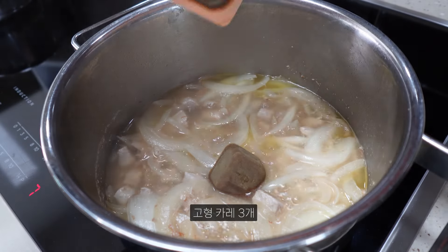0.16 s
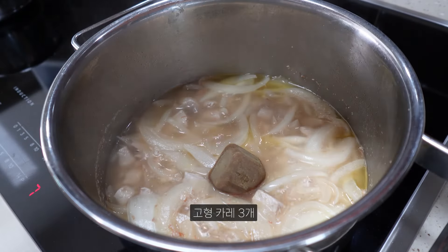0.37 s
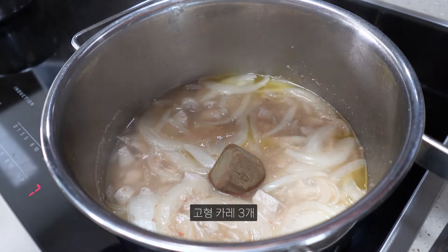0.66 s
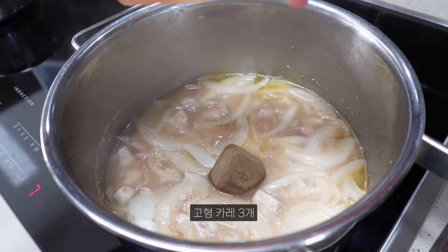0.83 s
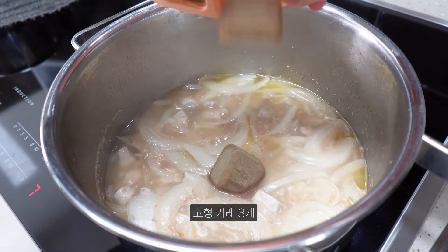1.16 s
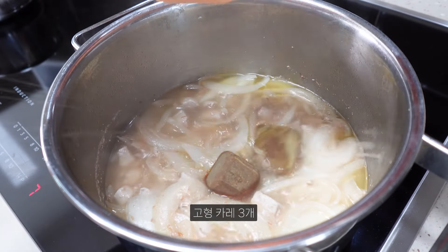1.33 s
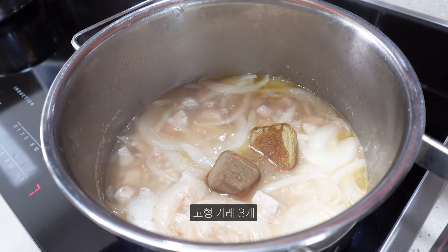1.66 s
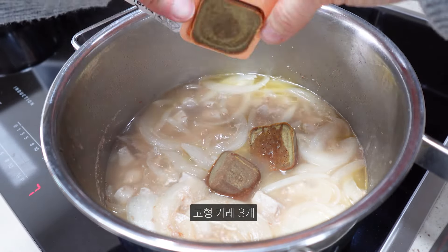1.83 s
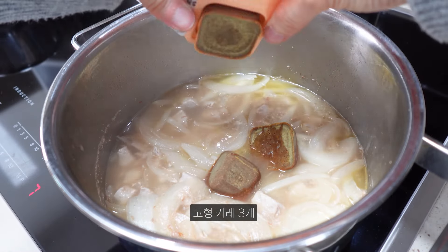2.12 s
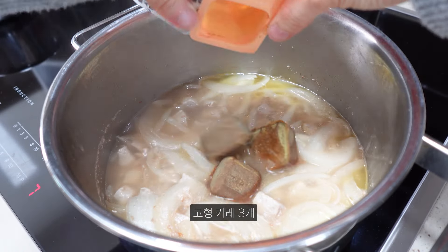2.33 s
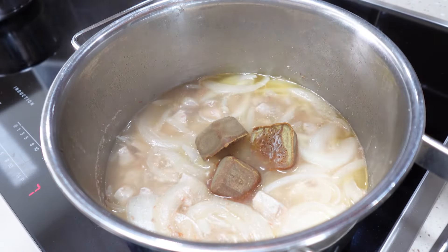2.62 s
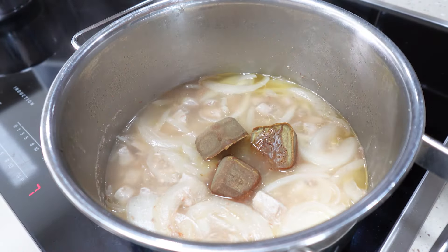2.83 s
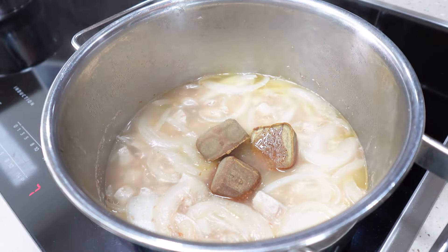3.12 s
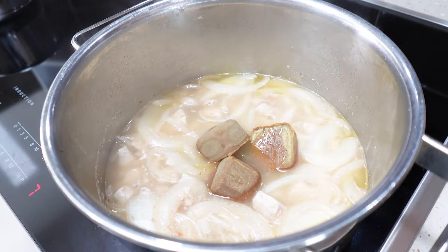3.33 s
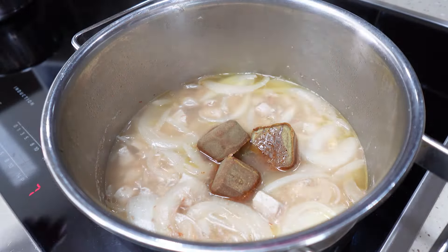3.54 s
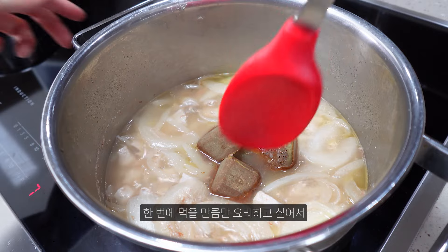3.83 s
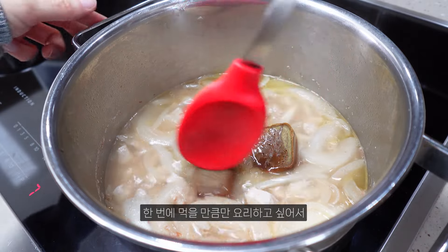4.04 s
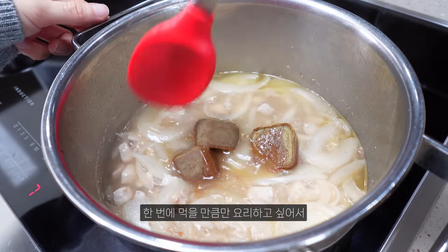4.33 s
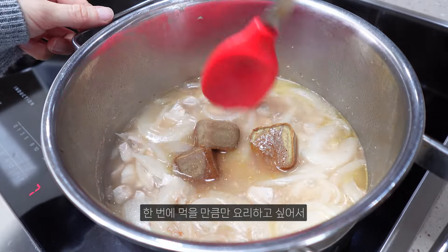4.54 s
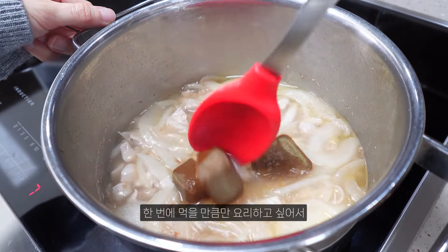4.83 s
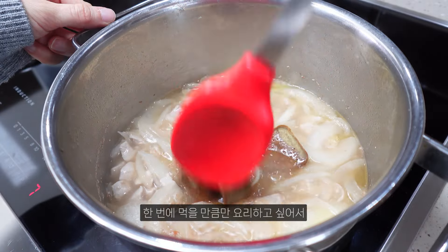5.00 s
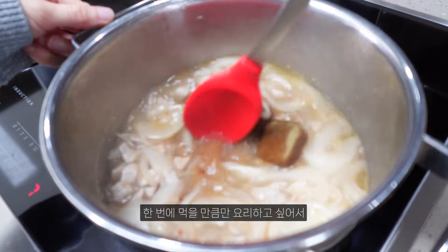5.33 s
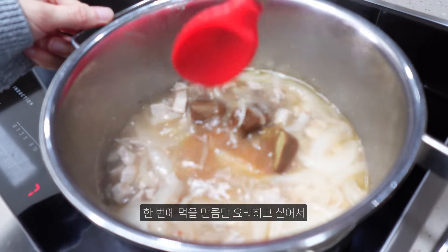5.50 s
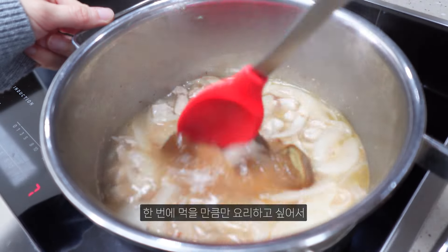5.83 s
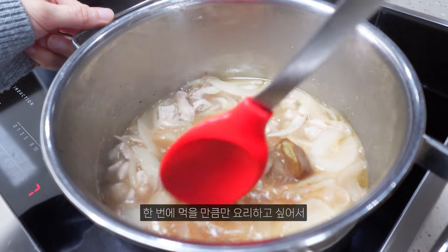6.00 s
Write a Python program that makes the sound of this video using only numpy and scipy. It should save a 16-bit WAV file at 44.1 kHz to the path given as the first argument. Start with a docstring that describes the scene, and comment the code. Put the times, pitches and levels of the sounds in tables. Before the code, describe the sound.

A steel pot of broth simmers throughout, heard from close above in a kitchen: tiny bubbles fizz and pop over a low, hollow bubbling, with a faint hum and thin hiss from the hob. For the first three seconds a stiff plastic tray is flexed, giving loud, sharp cracks and a light finger rustle. The cracks come in clusters around 0.6 and 0.9 seconds, most densely from 1.2 to 1.6, and again from 2.3 to 3. Blocks plop into the broth at about 0.1, 1.3 to 1.5 and 2.4 to 2.6 seconds. Then the tray stops and everything is much quieter. From about 3.5 seconds a ladle stirs with soft wet slaps and rubs, the pot wall ringing faintly at first. The boil swells briefly at 4 seconds, and gentle stirring, small pops and dull steam knocks continue until the end, just after 6 seconds.

```python
"""A steel pot of broth simmers on a humming, hissing induction hob, heard from close above.
From the start a plastic tray is flexed and cracks in clusters, and stock blocks plop into the broth.
After three seconds the tray falls quiet; a ladle stirs with soft wet slaps and the pot wall rings.
All the way to the end, tiny bubbles burst on the surface while big steam bubbles
collapse on the base and thump the air column of the pot."""
import sys
import numpy as np
from scipy import signal
from scipy.fft import rfft, irfft
from scipy.io import wavfile
from scipy.ndimage import uniform_filter1d, minimum_filter1d

SR = 44100
rng = np.random.default_rng(int(sys.argv[2]) if len(sys.argv) > 2 else 0)


def wrap_up_sound(samples):
    """Save the sound to the file named by the first command line argument, as 16-bit audio."""
    columns = np.atleast_2d(samples).T
    # keep every value between -1 and 1, then stretch to whole-number steps
    tamed = np.clip(columns, -1, 1)
    steps = np.round(tamed * 32767).astype(np.int16)
    wavfile.write(sys.argv[1], SR, steps)


N = 271656
T = np.arange(N) / SR


def undb(db):
    return 10 ** (np.asarray(db) / 20)


def unit(x):
    return x / np.sqrt(np.mean(x ** 2))


def noise(size=N):
    return rng.standard_normal(size)


def fade(size, t60):
    return 1000. ** (-np.arange(size) / SR / max(t60, .001))


def ring(x, hz, width):
    """Two-pole resonance, gain 1 at the centre; width in Hz."""
    hz = min(hz, .4 * SR)
    return signal.lfilter(*signal.iirpeak(hz, max(hz / width, .3), fs=SR), x)


def curve(table):
    """One automation curve for each column after the time."""
    times, *columns = np.transpose(table)
    return [np.interp(T, times, column) for column in columns]


def flicker(rate):
    """Random levels held 1 / rate s and smoothed twice; spread near 1."""
    hold = int(SR / rate)
    steps = np.repeat(noise(N // hold + 1), hold)
    return unit(uniform_filter1d(uniform_filter1d(steps, hold), hold)[:N])


def colour(x, shape):
    """Equalises x along a (frequency [Hz], gain [dB]) curve, to unit RMS."""
    hz, db = np.transpose(shape)
    bins_hz = np.maximum(np.arange(N // 2 + 1) * SR / N, 1)
    gain = undb(np.interp(np.log(bins_hz), np.log(hz), db))
    return unit(irfft(rfft(x) * gain, N))


def place(out, start, grain, db, pan_db=0):
    """Lays a grain of the given peak level into the two channels."""
    i = int(start * SR)
    grain = grain[:N - i] / np.max(np.abs(grain))
    out[:, i:i + len(grain)] += undb(db + np.array([[pan_db], [-pan_db]]) / 2) * grain


def wide(make, side_db):
    """Two unrelated draws as mid and side."""
    return make() + undb(side_db) * make() * np.array([[1], [-1]])


def bubble(hz, t60, glide, size=3000):
    """A damped sine that glides up as the cavity closes."""
    t = np.arange(size) / SR
    return np.sin(2 * np.pi * hz * (t + glide * t ** 2 / t60)) * fade(size, t60)


def pop(hz):
    """A skin of broth tears: a ragged tick of noise around the pitch of the bubble."""
    tear = noise(300) * fade(300, 0.0054)
    return ring(ring(tear, hz, 0.34 * hz), hz, hz)


def tray_cracks():
    """Each crack is a quick cluster of slips that rings the stiff plastic."""
    # cracks: (time [s], level [dB], main ring [Hz], low ring re main [dB], treble re main [dB], t60 [s])
    cracks = [(0.0275, -19.5, 2360, -27, -9, 0.016), (0.0424, -15, 3540, -19, -8, 0.012),
              (0.0637, -9.5, 3860, -16, -2.5, 0.011), (0.3723, -23, 3270, -20, -14.5, 0.012),
              (0.4718, -30, 2270, -15, -11, 0.009), (0.4975, -26.5, 3350, -15, -14, 0.009),
              (0.549, -23, 3210, -18, -9, 0.009), (0.5737, 0, 4220, -11.5, -8, 0.007),
              (0.6258, -22, 2360, -20, -16, 0.009), (0.666, -20, 5110, -18, -11, 0.014),
              (0.6785, 1, 4340, -22, -7.5, 0.0046), (0.9273, -7, 4700, -17, -3, 0.009),
              (0.9397, -1, 3630, -27, -2, 0.0096), (0.9598, -6, 3080, -15, 1, 0.02),
              (1.1038, -23.5, 4700, -10, -13, 0.012), (1.1593, -14.5, 2600, -20, -13, 0.013),
              (1.173, -10.5, 2180, -24, -3, 0.022), (1.2413, -7.5, 4050, -20, -13, 0.014),
              (1.2822, -4, 4060, -24, -21, 0.009), (1.2927, -0.5, 1930, -10, -22, 0.0098),
              (1.3029, -12, 2240, -13, -15, 0.0081), (1.3185, -2, 3930, -15, -18, 0.0084),
              (1.3349, -2, 2270, -10.5, -6.5, 0.0085), (1.3642, -3.5, 3730, -15, -20, 0.0083),
              (1.4438, -12, 1840, -2, -19, 0.012), (1.4635, -2.5, 3170, -15, 3.5, 0.012),
              (1.4804, 0, 3970, -19, -8, 0.01), (1.4927, -4, 6200, -15, -11, 0.012),
              (1.497, 0, 4230, -9, -14, 0.012), (1.5132, -11, 3200, -23, -17, 0.0072),
              (1.5356, -6, 5960, -13, -18, 0.007), (1.5568, -14, 3870, -17, -17, 0.009),
              (1.5658, -9, 3880, -21, -21, 0.0058), (1.5774, -10.5, 5960, -7.5, -22, 0.0083),
              (1.7822, -4.5, 3600, -17.5, -6.5, 0.01), (1.9959, -28, 2100, -18, -9, 0.009),
              (2.0496, -21.5, 2000, -21, -12, 0.0096), (2.1158, -21.5, 2040, -12, -11, 0.009),
              (2.2608, -13.5, 3400, -8, 2, 0.016), (2.3396, -24.5, 3570, -9, -11, 0.009),
              (2.364, -7.5, 6240, -11.5, -19, 0.014), (2.3765, -7.5, 6400, -9, -19, 0.02),
              (2.392, 0, 3040, -32, -6, 0.019), (2.4937, -19, 3650, -1, -15, 0.0084),
              (2.5614, -37, 2800, -15, -11, 0.009), (2.6136, -2.5, 2900, -11, -6.5, 0.0081),
              (2.7071, -15.5, 3300, -10.5, -12, 0.0072), (2.7713, -15.5, 2450, -15, -12, 0.0075),
              (2.8325, -2, 5600, -13, -4, 0.014), (2.9317, -19.5, 2470, -13, -13, 0.013),
              (2.956, -21.5, 3500, -8, -11, 0.014), (2.9609, -9.5, 3350, -15.5, -26, 0.018)]
    # the tray drifts to the left: (time [s], left minus right [dB])
    drift = [(0, 1), (1.5, .5), (2.5, 0.5), (3.0, 2.5)]
    out = np.zeros((2, N))
    for start, db, hz, low_db, treble_db, t60 in cracks:
        slips = noise(2000) * fade(2000, t60)
        slips[8] = 2.23  # a sharp first snap
        main = unit(ring(ring(slips, hz, 0.75 * hz), hz, 1.5 * hz))
        low = unit(ring(ring(slips, 1570, 490), 1060, 670))
        attack = slips * fade(2000, 0.0063)  # the treble dies first
        treble = unit(ring(ring(attack, 7900, 9800), 9800, 18200))
        crack = main + undb(low_db) * low + undb(treble_db) * treble
        pan_db = np.interp(start, *np.transpose(drift)) + 0.8 * rng.standard_normal()
        place(out, start + .0007, crack, db, pan_db)
    return out


def finger_rustle():
    """Fingers shift on the tray with a gritty rustle."""
    # finger friction: (time [s], level [dB])
    friction = [(0.0, -40), (0.11, -54), (0.36, -46.5), (0.53, -45.5), (0.8, -56), (1.02, -47.5),
                (1.2, -47), (1.37, -39.5), (1.57, -43.5), (1.72, -57.5), (1.9, -64), (2.17, -50.5),
                (2.56, -50), (2.86, -45), (3.07, -52), (3.15, -67), (6.16, -82)]
    grit = noise() * undb(4.0 * flicker(110))
    return undb(curve(friction)[0]) * unit(ring(ring(grit, 1930, 4500), 2240, 9000))


def plops():
    """Blocks and drops slap the broth and trap a ringing bubble."""
    # landings: (time [s], level [dB], pitch [Hz], t60 [s], slap gain [dB])
    landings = [(.109, -12, 570, 0.012, -14), (.1447, -11, 520, 0.014, -9.5), (1.328, -9, 610, 0.015, 1.5),
                (1.377, -26, 617, 0.063, -15), (1.537, -8.5, 1076, 0.015, -9.5),
                (1.538, -18.5, 406, 0.02, -24), (2.358, -17.5, 392, 0.018, -7), (2.48, -19, 307, 0.02, -12),
                (2.494, -18.5, 344, 0.057, -2.5), (2.563, -13.5, 434, 0.0094, -10)]
    out = np.zeros((2, N))
    for start, db, hz, t60, slap_db in landings:
        slap = 2 * ring(ring(noise(3000), 1650, 1250), 1900, 1600) * fade(3000, 0.033)
        place(out, start, undb(slap_db) * slap - bubble(hz, t60, glide=0.049), db)
    return out


def steam_thumps():
    """Big steam bubbles collapse on the base, each a round, low knock."""
    # collapses: (time [s], level [dB], pitch [Hz])
    collapses = [(0.612, -43, 337), (0.793, -34, 358), (1.048, -28.5, 354), (1.291, -31, 600),
                 (1.433, -43, 363), (1.786, -35, 364), (1.942, -29.5, 365), (2.057, -43, 370),
                 (2.164, -32, 385), (2.258, -29.5, 370), (2.7, -30.5, 378), (3.84, -32, 287),
                 (4.046, -32.5, 238), (4.091, -37, 376), (4.355, -38, 353), (5.082, -36, 340),
                 (5.32, -33, 372), (5.577, -35, 368), (5.727, -35, 352), (5.806, -32.5, 229)]
    out = np.zeros((2, N))
    for start, db, hz in collapses:
        place(out, start, ring(bubble(hz, t60=0.04, glide=0.033), hz, 2.2 * hz), db)
    return out


def ladle_slaps():
    """The ladle slaps the broth: short, wet bursts of pitched noise."""
    # slaps: (time [s], level [dB], pitch [Hz])
    slaps = [(3.511, -39, 3330), (3.839, -36, 3640), (3.864, -41, 2380), (3.973, -41.5, 2410),
             (3.99, -42, 1230), (4.041, -37, 3870), (4.184, -38, 1230), (4.488, -40, 1040),
             (4.586, -39, 3700), (4.627, -41.5, 3980), (4.827, -36.5, 1220), (5.083, -39, 3270),
             (5.157, -35.5, 4320), (5.273, -46, 2450), (5.32, -41, 4200), (5.502, -41, 3660),
             (5.763, -38, 1230), (5.964, -35.5, 3730)]
    out = np.zeros((2, N))
    for start, db, hz in slaps:
        splash = noise(3000) * fade(3000, t60=0.05)
        place(out, start, ring(ring(splash, hz, 570), hz, 1100), db)
    return out


def surface_pops():
    """Single small bubbles burst at the surface and stand out of the fizz."""
    # bursts: (time [s], level [dB], pitch [Hz])
    bursts = [(0.519, -28, 8120), (0.8175, -31, 12200), (0.839, -30, 12200), (0.8684, -33, 12500),
              (0.9981, -28, 8920), (1.0206, -29, 10800), (1.1433, -28, 6240), (1.402, -29, 7210),
              (1.6945, -30, 7610), (1.914, -25, 12200), (2.0901, -29, 10300), (2.2338, -25, 9960),
              (2.465, -28, 8420), (2.539, -30, 12400), (2.693, -33, 7400), (2.9194, -34, 5350),
              (2.9901, -29, 13600), (3.074, -27.5, 9250), (3.109, -29, 13000), (3.1547, -31, 12100),
              (3.1892, -31, 12500), (3.3744, -27, 10600), (3.3877, -29, 8600), (3.4136, -23.5, 11500),
              (3.436, -29, 10700), (3.6272, -29, 13000), (3.7035, -27, 14000), (3.7274, -28.5, 9100),
              (3.9175, -28.5, 9200), (3.9936, -28, 9500), (4.0612, -31, 13400), (4.138, -31, 9850),
              (4.1827, -35, 10600), (4.2497, -32, 8800), (4.2702, -31, 10900), (4.35, -24, 12100),
              (4.4129, -32, 9200), (4.4483, -27, 8600), (4.5136, -33, 12400), (4.5376, -28, 13200),
              (4.587, -27.5, 7400), (4.6094, -34, 12300), (4.6932, -31, 13200), (4.7373, -30, 11900),
              (4.7936, -27.5, 7460), (4.8479, -28, 12900), (5.1078, -29, 12400), (5.13, -28.5, 6920),
              (5.1901, -35, 7500), (5.224, -23.5, 8200), (5.3597, -32, 13500), (5.5119, -32.5, 7920),
              (5.6535, -30, 13500), (5.889, -27.5, 13000)]
    out = np.zeros((2, N))
    for start, db, hz in bursts:
        place(out, start + 0.00031, pop(hz), db, pan_db=.4)
    return out


def rubs_and_wall_ring():
    """Fingers and ladle rub and squelch; around 3.5-4 s the pot's steel wall rings near 2.4 kHz."""
    # grainy, pitched swells: (start [s], length [s], pitch [Hz], width [Hz], level [dB])
    swells = [(0.191, 0.05, 10500, 3000, -44.5), (0.289, 0.019, 1860, 2520, -36),
              (0.379, 0.019, 5000, 4000, -37.5), (0.411, 0.02, 5030, 7000, -38),
              (0.484, 0.062, 3330, 900, -46), (1.179, 0.05, 1290, 500, -38),
              (1.184, 0.016, 2050, 300, -48.5), (1.396, 0.09, 3400, 1200, -44),
              (2.181, 0.085, 2050, 400, -45.5), (2.399, 0.067, 2930, 1500, -43.5),
              (3.507, 0.13, 3430, 500, -55.5), (4.63, 0.15, 2440, 300, -51),
              (5.017, 0.067, 2280, 300, -51.5), (5.062, 0.19, 6000, 5000, -57),
              (0.574, 0.054, 4700, 900, -48), (0.685, 0.097, 4600, 1200, -52),
              (3.498, 0.51, 2370, 160, -58), (3.952, 0.31, 1380, 500, -59), (5.202, 0.16, 2500, 500, -55)]
    out = np.zeros(N)
    for start, length, hz, width, db in swells:
        i, size = int(start * SR), int(length * SR)
        grit = noise(N // 10) * undb(3.5 * flicker(300)[:N // 10])
        band = unit(ring(ring(grit, hz, width), hz, 2 * width))[1000:1000 + size]
        out[i:i + size] += undb(db) * band * np.hanning(size) ** .5
    return out


def steam_surges():
    """Steam swells and sinks, making the pot boom: gains of the air column and of the rumble."""
    # surges: (start [s], length [s], air column level [dB], rumble level [dB])
    surges = [(0.1, 0.1, -42.5, -51), (0.611, 0.046, -46, -53), (0.793, 0.12, -41.5, -50),
              (1.038, 0.048, -42, -49), (1.284, 0.11, -42.5, -45), (1.433, 0.032, -49, -53),
              (1.514, 0.052, -49, -51), (1.924, 0.25, -42.5, -50), (2.223, 0.088, -41.5, -50),
              (2.347, 0.042, -32.5, -51), (2.48, 0.19, -38.5, -52), (2.703, 0.041, -47, -51),
              (2.755, 0.073, -41.5, -50), (2.867, 0.04, -54, -49), (3.117, 0.044, -48, -53),
              (3.51, 0.064, -55, -50), (4.068, 0.089, -46, -55), (4.349, 0.038, -49, -50),
              (4.481, 0.05, -44, -52), (4.56, 0.176, -41.5, -50.5), (4.78, 0.041, -42, -51),
              (4.857, 0.036, -49, -51), (5.079, 0.068, -46, -51), (5.29, 0.078, -48.5, -51),
              (5.37, 0.044, -48, -52), (5.461, 0.066, -43, -54), (5.57, 0.049, -45, -53),
              (5.873, 0.081, -48, -49), (5.98, 0.048, -49, -51)]
    start, length, air_db, rumble_db = np.array(surges).T[:, :, None]
    swell = np.exp(-((T - start - length / 2) / (0.33 * length)) ** 2)
    return [np.sum(undb(db) * swell, axis=0) for db in (air_db, rumble_db)]


def boil_rumble():
    """Steam bubbles collapsing on the base blend into a dull rumble."""
    # tone of the boil: (frequency [Hz], gain [dB])
    tone = [(76, -29), (130, -48), (172, -18.5), (226, -0.5), (327, -11), (362, 2), (398, -6), (620, -10),
            (705, -15.5), (1000, -29), (1300, -37), (2200, -120)]
    return colour(noise() * undb(2.5 * flicker(60)), tone)


def pot_air():
    """The air column of the pot rings with a hollow note."""
    return unit(ring(noise(), hz=359, width=12.2))


def simmer():
    """Rumble and air column follow the strength of the boil, flickering and surging."""
    # how hard the broth boils: (time [s], level [dB])
    heat = [(0.0, -44), (0.58, -48.5), (1.47, -44.5), (1.73, -48.5), (1.97, -49), (2.14, -45.5),
            (2.33, -47.5), (2.43, -44.5), (2.66, -45.5), (2.8, -50), (3.0, -48), (3.41, -47.5), (3.59, -49),
            (3.82, -48), (4.03, -37), (4.19, -44.5), (4.36, -47), (6.16, -46.5)]
    heat_db = curve(heat)[0]
    air_surge, rumble_surge = steam_surges()
    rumble_gain = rumble_surge + undb(heat_db - 3 + 1.25 * flicker(14))
    air_gain = air_surge + undb(heat_db - 7 + 2.6 * flicker(14))
    return rumble_gain * wide(boil_rumble, side_db=-14) + air_gain * wide(pot_air, side_db=-14)


def fizz():
    """The finest bubbles burst densely, some louder than the rest, over a soft hiss."""
    # strength of the fizz: (time [s], level [dB])
    strength = [(0, -43), (.3, -51), (.6, -47), (1.0, -50), (1.45, -46.5), (1.8, -51), (2.3, -49.5),
                (3.0, -52.5), (3.4, -52), (3.6, -53.5), (4.3, -51.5), (4.5, -54.5), (4.7, -52.5),
                (4.95, -56), (5.2, -48.5), (5.3, -57), (6.16, -63)]
    ticks = np.zeros((2, N))
    for when, pitch, chance, pan in rng.random((2200, 4)):
        hz = 15500 - 9000 * pitch ** 1.4
        db = min(-5.5 * np.log(chance), 16)
        place(ticks, when * (N - 400) / SR, pop(hz), db, pan_db=3 * (pan - .5))
    hiss = wide(lambda: unit(ring(noise(), 6100, 8200)), side_db=-10)
    gain = undb(curve(strength)[0] + 1.5 * flicker(21))
    return gain * (unit(ticks) + undb(-4.5) * hiss)


def pot_wall():
    """The steel wall sings faintly on the hob in wavering bands."""
    # wall resonances: (pitch [Hz], width [Hz], level [dB])
    modes = [(1297, 140, -61.5), (2305, 200, -60), (3480, 620, -58.5)]
    return sum(undb(db + flicker(10)) * unit(ring(noise(), hz, width)) for hz, width, db in modes)


def hob_hiss():
    """The hob hisses in a thin, high band that sags, then drifts upward."""
    # path of the hiss: (time [s], centre [Hz], level [dB])
    path = [(0, 12740, -54), (1.5, 12300, -57), (3, 12450, -55), (4.5, 12900, -58.5), (6.16, 13200, -59)]
    hz, db = curve(path)
    # low-passed noise carried on the drifting centre
    band = unit(signal.lfilter(*signal.butter(2, 400, fs=SR), noise((2, N))))
    phase = 2 * np.pi * np.cumsum(hz) / SR
    return undb(db) * (band[0] * np.cos(phase) + band[1] * np.sin(phase))


def hob_hum():
    """Wavering mains hum of the hob."""
    return undb(-63) * unit(ring(noise(), hz=101, width=5.5))


def kitchen_air():
    """A steady bed of room tone."""
    # tone of the kitchen: (frequency [Hz], gain [dB])
    tone = [(15, -68), (25, -47), (96, -11.5), (298, -6.5), (360, -3.5), (423, -8.5), (600, -18),
            (923, -16), (1310, -17), (2020, -22), (2370, -16), (5610, -31.5), (10700, -46), (13300, -24.5),
            (15600, -25.5)]
    return undb(-50.5) * colour(noise(), tone)


def echoes(x, t60, hz, db):
    """Reflections blur into a diffuse tail, slightly different in each channel."""
    size = int(.5 * SR)
    tail = wide(lambda: ring(noise(size), hz, 2.0 * hz) * fade(size, t60), side_db=-10)
    tail /= np.sqrt(np.sum(tail[0] ** 2))
    return undb(db) * signal.fftconvolve(x, tail, axes=1)[:, :N]


def scene():
    """Close hits echo in the pot and the kitchen, over the simmer and the hob."""
    tray = tray_cracks() + finger_rustle()
    broth = plops() + steam_thumps() + ladle_slaps() + surface_pops()
    low_cut = signal.butter(3, 220, "high", fs=SR, output="sos")
    hits = signal.sosfilt(low_cut, tray + broth + rubs_and_wall_ring())
    pot_tail = echoes(hits, t60=0.05, hz=2170, db=-17)
    kitchen_tail = echoes(hits, t60=0.18, hz=1580, db=-19.5)
    bed = wide(lambda: pot_wall() + hob_hiss() + kitchen_air(), side_db=-11)
    hum = wide(hob_hum, side_db=-25)
    return hits + pot_tail + kitchen_tail + simmer() + fizz() + bed + hum


def record(dry):
    """A phone drops the deepest bass, limits the loudest cracks and cuts the top."""
    ceiling_db, top_hz = -1.2, 15750
    low_cut = signal.butter(2, 40, "high", fs=SR, output="sos")
    high_cut = signal.ellip(8, .1, 50, top_hz, fs=SR, output="sos")
    filtered = signal.sosfiltfilt(high_cut, signal.sosfilt(low_cut, dry))
    # look-ahead limiter: the gain dips smoothly for a few milliseconds around each overload
    peak = np.max(np.abs(filtered), axis=0) + 1e-9
    held = minimum_filter1d(np.minimum(undb(ceiling_db) / peak, 1), size=129)
    gain = uniform_filter1d(uniform_filter1d(held, size=33), size=33)
    return signal.sosfiltfilt(high_cut, filtered * gain)


dry = scene()
out = record(dry)
wrap_up_sound(out)
```